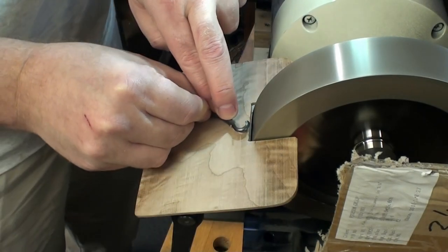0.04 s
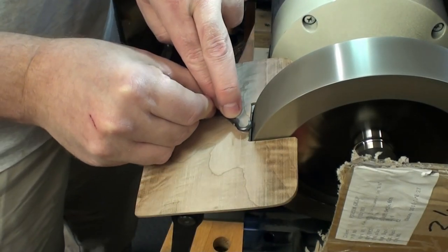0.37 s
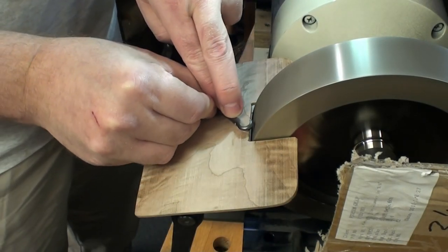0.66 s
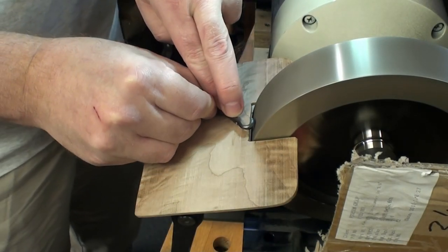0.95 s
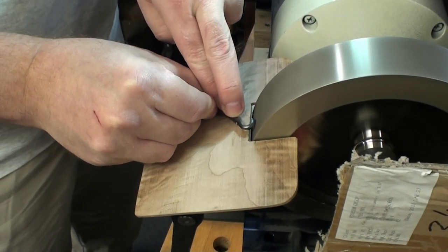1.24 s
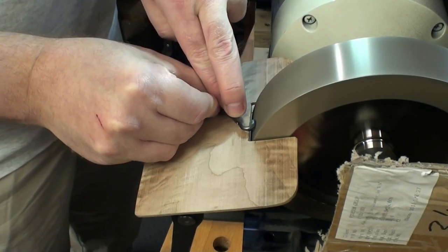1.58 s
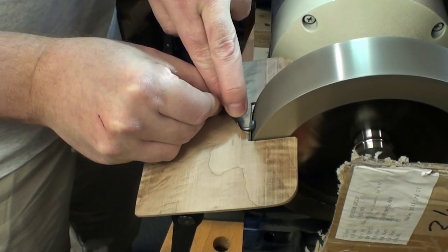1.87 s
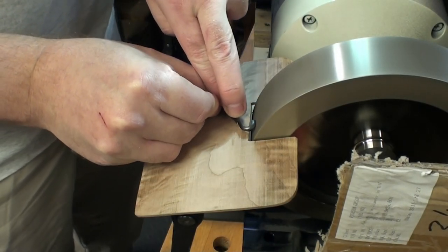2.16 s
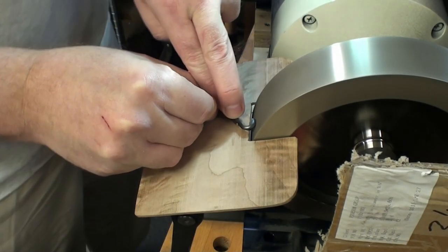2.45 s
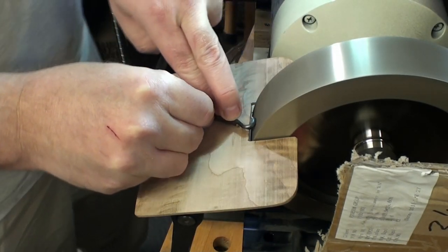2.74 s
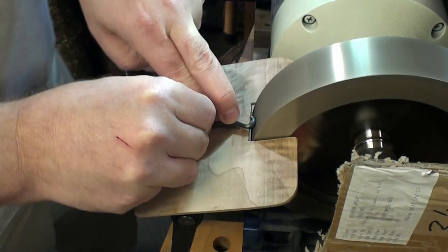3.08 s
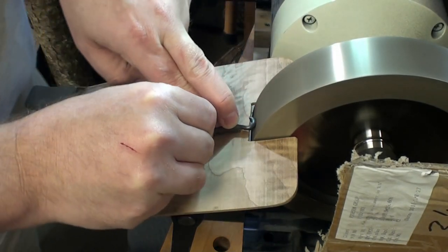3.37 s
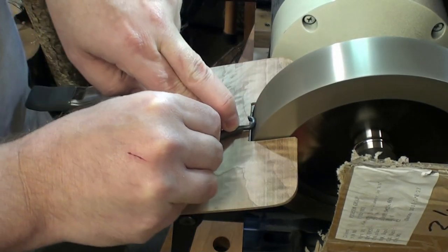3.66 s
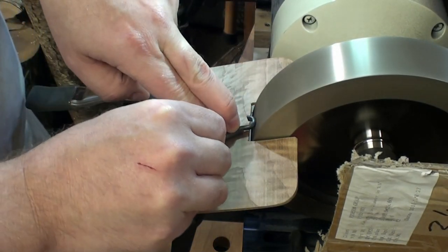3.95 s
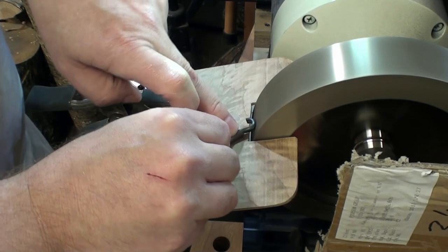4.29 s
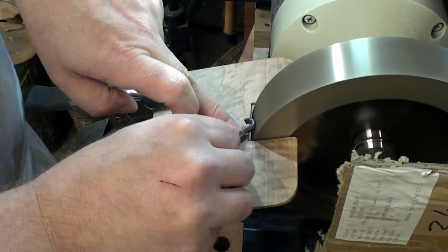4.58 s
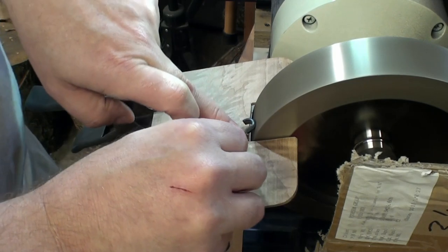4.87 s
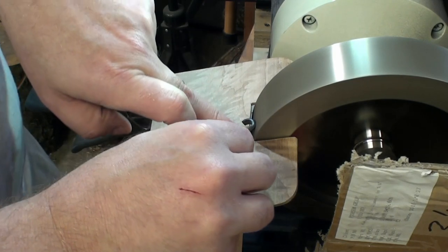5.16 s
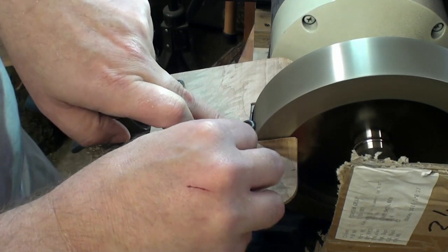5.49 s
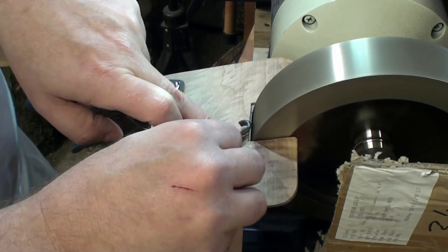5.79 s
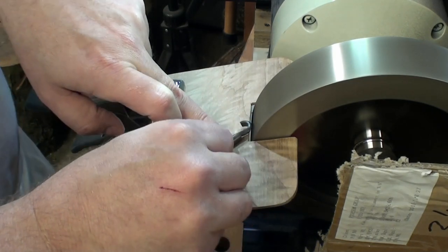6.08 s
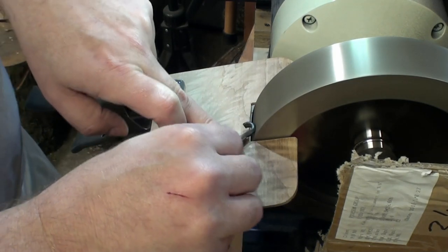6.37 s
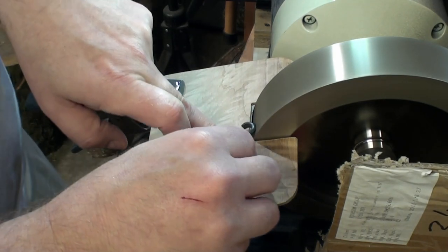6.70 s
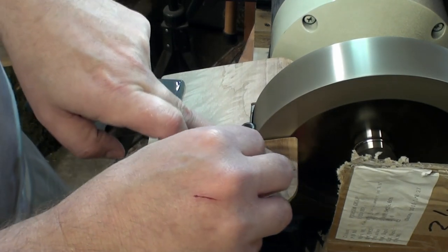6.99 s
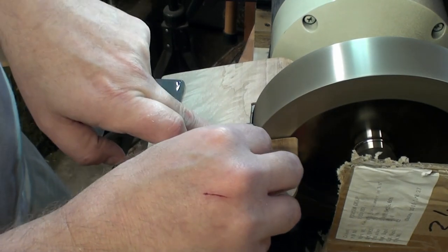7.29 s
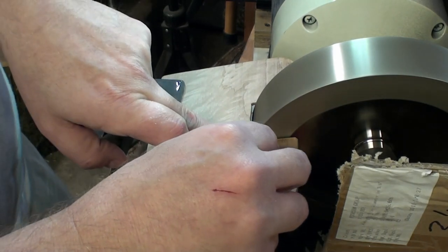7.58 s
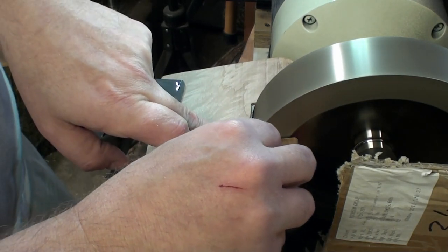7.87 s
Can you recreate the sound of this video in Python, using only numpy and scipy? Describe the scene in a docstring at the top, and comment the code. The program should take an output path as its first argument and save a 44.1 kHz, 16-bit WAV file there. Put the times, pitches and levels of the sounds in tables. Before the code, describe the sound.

A bench grinder hums steadily, then a steel tool meets the wheel twice with a loud, buzzing grinding hiss.

```python
"""Grinding a tool at the workshop bench

A camera's two microphones stand close to a bench grinder humming at thirty turns a second. A steel tool
meets the metal wheel twice. The same grits pass under the edge on every turn, so the hiss buzzes; its
resonances shift as the tool is rolled and sharpen as the push eases. The wheel rings on when the tool
lifts, and the camera's limiter pushes the hum down under the grinding."""
import sys
import numpy as np
from scipy import signal
from scipy.fft import rfft, irfft
from scipy.io import wavfile
from scipy.ndimage import uniform_filter1d, map_coordinates

SR = 44100
rng = np.random.default_rng(int(sys.argv[2]) if len(sys.argv) > 2 else 0)


def log_audio(samples):
    """Write samples as a 16-bit WAV file to the path given in sys.argv[1]."""
    # one column per channel
    frames = np.atleast_2d(samples).T
    # limit to full scale, then quantise
    limited = np.clip(frames, -1, 1)
    pcm = np.round(limited * 32767).astype(np.int16)
    wavfile.write(sys.argv[1], SR, pcm)


N = 358974
TIME = np.arange(N) / SR


# How closely the edge keeps its track. Each row: time in seconds, likeness of successive turns (0-1).
TRACK = [(1.7, 1), (2.6, 0.68), (4.2, 0.82), (5, 0.81), (6, 0.33), (7.8, 0.86)]
# The grip tunes the shank and damps the top of the hiss.
# Each row: time in seconds, shank resonance in Hz, gain above 13 kHz in dB.
GRIP = [(1.6, 4950, 6), (3.5, 5130, 1), (4.2, 4870, -1.5), (5.4, 5240, -3.5), (5.72, 4940, 7),
        (6.35, 5077, 1), (6.9, 5170, -6), (7.4, 4750, -8), (8.1, 4930, -10)]
# Steady peaks and dips of the tool and its rest. Each row: centre in Hz, width in Hz, gain in dB.
STEEL = [(880, 110, -2), (1790, 110, 5), (2090, 60, 3), (2420, 60, 3), (2880, 70, -3), (3550, 110, 2),
         (4200, 110, 3), (4500, 90, -3), (6900, 120, 2), (10900, 120, 2), (11620, 140, -6),
         (12450, 200, -4), (13900, 280, 5), (15100, 200, -3), (15600, 150, 3)]

def scrape(turns, db=-6, shank_width_hz=200, shank_damping=1.46, ring_hz=5050, echo_s=.00164):
    """Close up and dead centre, grits strike the edge and excite the tool's resonances."""
    grits = surface(turns, follow(TRACK)[0])
    hz, t, spectrum = signal.stft(grits, SR, nperseg=512, noverlap=384)
    hz = hz[:, None]
    force_db = force(t)
    place, free_db = hold(t)
    shank_hz, top_db = follow(GRIP, t)
    shank_db = free_db + response(place, 8.7, 2.36, 1.2, (0.51, 0.072, -6.5), (0.832, 0.015, 2.6))
    colour_db = force_db + edge_colour(hz, place) + tool_resonances(hz, place, force_db)
    colour_db += top_db * np.clip((hz - 11800) / 1200, 0, 1)
    colour_db += (shank_db - shank_damping * force_db) * bell(hz, shank_hz, shank_width_hz)
    colour_db += blade_song(hz, t) + peaks(STEEL, hz)
    radiation = hz ** 2 / (hz ** 2 + 260 ** 2)  # a small tool gives off little bass
    bench = 1 + 0.22 * np.exp(-2j * np.pi * hz * echo_s)  # the bench top throws the hiss back
    spectrum = spectrum * gain_of(colour_db) * radiation * bench
    hiss = signal.istft(spectrum, SR, nperseg=512, noverlap=384)[1][:N]
    hiss *= skipping(turns) * contact()
    shank_ring = signal.lfilter(*signal.iirpeak(ring_hz, Q=450, fs=SR), hiss)
    return gain_of(db) * (hiss + 1.12 * shank_ring)


# The hiss of the tip and of the flank on the wheel. Each row: frequency in Hz, gain in dB.
TIP_COLOUR = [(800.0, -13), (1700.0, 0), (2800.0, 2), (4200.0, -6), (4900.0, 0.7), (7000.0, 5.5),
              (8100.0, 3.5), (9200.0, 11.5), (11200.0, 13.5), (11600.0, -14), (12400.0, 7), (13300.0, -1.5),
              (14500.0, -14), (15700.0, -3)]
FLANK_COLOUR = [(700.0, -25.5), (1200.0, -8.5), (2600.0, -0.5), (3200.0, -3), (4100.0, 2), (7000.0, 0.2),
                (8400.0, 2.8), (9400.0, -6), (10400.0, -6), (11100.0, -7), (12600.0, 1.5), (13800.0, -2),
                (15000.0, -1), (15700.0, -22)]

def edge_colour(hz, place):
    """The colour of the hiss in dB as the tool rolls from tip to flank."""
    flank = on_flank(place)
    return (1 - flank) * read(TIP_COLOUR, hz) + flank * read(FLANK_COLOUR, hz)


# The tool's damped modes. Each row: pitches in Hz (start of tip, end of tip, corner), rise in Hz per dB
# of force, width in Hz, damping in dB per dB of force, arguments of response().
TOOL_MODES = [((2300, 1200, 1650), 50, 253, 1.87, (1, 1, -2.5, (0.608, 0.027, 8.5))), ((1930, 2130, 3670),
              16, 160, 0.3, (4.4, 0, 0, (0.461, 0.033, 12.8))), ((6030, 5940, 6570),
              28, 415, 1.45, (14.9, 4.2, -18, (0.582, 0.022, 9.4), (0.838, 0.017, 8.1))),
              ((5700, 9300, 9370), 15, 402, 0.88, (1, 20.7, -35, (0.571, 0.065, -22),
              (0.501, 0.032, 12.1)))]

def tool_resonances(hz, place, force_db, widening=0.16):
    """The tool's peaks in dB: a harder push raises their pitch, widens them and damps them."""
    colour_db = 0
    for pitches_hz, rise, width, damping, answer in TOOL_MODES:
        centre = np.interp(place, [0, TIP_ENDS, 1], pitches_hz) + rise * force_db
        peak_db = response(place, *answer) - damping * force_db
        colour_db += peak_db * bell(hz, centre, width * gain_of(widening * force_db))
    return colour_db


# Spells of singing. Each row: middle and half length in seconds, pitch in Hz, boost in dB.
SINGS = [(3.258, 0.15, 2047, 14.5), (3.953, 0.38, 2033, 21), (5.35, 0.32, 1970, 8)]

def blade_song(hz, t, width_hz=37):
    """The blade sings thinly for a while: a narrow peak, in dB, swells and fades."""
    return sum(db * arch(middle, half, t) * bell(hz, pitch, width_hz)
               for middle, half, pitch, db in SINGS)


# Passes on the wheel. Each row: touch, lift and time taken to lift in seconds, place on the edge
# at touch and at lift (0 tip, 1 far corner), shank boost in dB.
PASSES = [(1.546, 5.77, .07, 0.085, 0.878, -2.5), (6.308, 8.3, .05, 0.93, 0.626, 6)]
TIP_ENDS, FLANK_BEGINS, CORNER_BEGINS = 0.35, 0.53, 0.864

def contact(bite=0.093, settle_s=0.012):
    """About 1 while the edge touches the wheel: it bites hard at once and lifts gradually."""
    touching = np.zeros(N)
    for on, off, lift_s, *_ in PASSES:
        landing = np.clip((TIME - on) / 0.00025, 0, 1) * (1 + bite * np.exp(-abs(TIME - on) / settle_s))
        touching += landing * np.clip((off - TIME) / lift_s, 0, 1)
    return touching


def hold(t):
    """The tool rolls evenly: the place that touches the wheel, and how freely the shank rings (dB)."""
    path = []
    for on, off, _, first, last, shank_db in PASSES:
        path += [(on, first, shank_db), (off, last, shank_db)]
    return follow(path, t)


def on_flank(place):
    """0 while the tip is ground, 1 on the flank."""
    return np.clip((place - TIP_ENDS) / (FLANK_BEGINS - TIP_ENDS), 0, 1)


def response(place, tip_db, flank_db, corner_db, *spots):
    """A mode's answer in dB to a strike here; spots are nodes and antinodes (place, reach, dB)."""
    corner = np.clip((place - CORNER_BEGINS) / (1 - CORNER_BEGINS), 0, 1)
    return tip_db + (flank_db - tip_db) * on_flank(place) + corner_db * corner + peaks(spots, place)


# The hand's push. Each row: time in seconds, force in dB (0 is firm).
PUSH = [(1.55, -2), (2.45, 1.5), (3.2, -2.5), (3.6, -4.5), (4.25, -2), (4.8, -3), (5.38, -3), (5.7, -12.5),
        (6.33, -12.5), (6.55, -7.5), (6.75, -8), (6.95, 0.5), (7.45, -0.5), (8.1, -4)]

def force(t):
    """Force on the wheel in dB: the push, less what is lost while the tool chatters."""
    return follow(PUSH, t)[0] - sum(db * arch(middle, half, t) for middle, half, _, db in CHATTER)


# The hold slackens and the tool skips once a turn. Each row: middle and half length in seconds,
# share of the turn off the wheel, force lost in dB.
CHATTER = [(2.928, 0.2, 0.26, 2), (3.822, 0.048, 0.89, 6), (3.957, 0.097, 0.33, 3.5),
           (6.696, 0.081, 0.48, 2.5)]

def skipping(turns, low_spot_s=2.938, runout=0.12):
    """The wheel runs slightly out of true: the edge loses it at the low spot and lands the harder."""
    from_low_spot = abs((turns - np.interp(low_spot_s, TIME, turns) + .5) % 1 - .5)
    gap = np.clip(sum(off * arch(middle, half, TIME) for middle, half, off, _ in CHATTER), 0, 1)
    touching = np.clip((from_low_spot - gap / 2) / .07 + 1, .19, 1)
    return touching * (1 - runout * np.cos(2 * np.pi * from_low_spot)) / np.sqrt(1 - gap / 2)


def surface(turns, likeness, grits_per_turn=1475):
    """Roughness round the wheel, read once a turn; each turn keeps a share of the one before."""
    count = int(turns[-1]) + 2
    keep = np.clip(np.interp(np.arange(count), turns, likeness), 0, .99)
    grits = rng.standard_normal((count, grits_per_turn))
    for k in range(1, count):
        grits[k] = keep[k] * grits[k - 1] + np.sqrt(1 - keep[k] ** 2) * grits[k]
    return unit_rms(map_coordinates(grits.ravel(), [turns * grits_per_turn], order=5, mode="nearest"))


# The wheel's four families of modes. Each row: seconds to fall 60 dB, blur under the edge in Hz,
# arguments of response().
WHEEL_FAMILIES = [(1.1, 7.8, (-19.5, -15, -14, (0.69, 0.087, 6.9))),
                  (1.17, 8.1, (-23.5, -16, -4, (0.53, 0.24, 2.5))),
                  (0.18, 63, (-23, -22.5, -5.9, (.6, 0.15, 10.4))),
                  (2.56, 11, (-12, -18.5, -10, (0.24, 0.24, 3.5)))]
# Each row: one family's modes, as pairs of pitch in Hz and relative level in dB.
WHEEL_MODES = [
    [(6340, 0)],
    [(6511, -1), (11090, -15), (11300, -16), (2405, -16)],
    [(7803, -1)],
    [(11934, -2), (12077, -2)],
]

def wheel(flutter=0.63, force_share=0.23):
    """The wheel's modes store energy: they flutter under the grits and ring clean once the tool is off."""
    blur = np.clip(flutter * uniform_filter1d(contact(), size=2000), 0, 1)
    drive = contact() * gain_of(force_share * force(TIME))
    place, out = hold(TIME)[0], np.zeros(N)
    for (t60, blur_hz, answer), modes in zip(WHEEL_FAMILIES, WHEEL_MODES):
        keep = gain_of(-60 / (t60 * SR)) ** 2
        power = (drive * gain_of(response(place, *answer))) ** 2
        level = np.sqrt(signal.lfilter([1 - keep], [1, -keep], power))
        for hz, mode_db in modes:
            swing = np.sqrt(1 - blur ** 2) + blur * (drift(blur_hz).real + 1j * drift(blur_hz).real)
            out += level * gain_of(mode_db) * (swing * phasor(hz * TIME)).real
    return np.sqrt(2) * out


# Tones of motor and bench. Each row: multiple of the shaft speed, base level in dB.
SHAFT_ORDERS = [(4, -33.5), (5, -38), (6, -47), (8, -28), (9, -64), (10, -46), (11, -36.5), (12, -34),
                (13, -35.5), (14, -47.5), (15, -39), (17, -35.5), (21, -36.5), (22, -43.5), (23, -43),
                (24, -70), (26, -42.5), (30, -42), (34, -48.5), (35, -34.5), (37, -44), (38, -59)]
# Hands move between motor and microphones. Each row: time in seconds, level shift in dB.
HAND_SHADING = [(0, 1.5), (.75, 7.5), (1.45, 3), (2.3, 5.5), (3.1, 4.5), (4.1, 0.5), (5.7, -2.5), (6.6, 2),
                (7.1, -1.5), (8.1, 1)]
# How each pitch follows that shift. Each row: frequency in Hz, share (negative goes the other way).
SHADING_SHARE = [(120, 0.37), (240, -0.54), (400, 0.6), (630, 1.04), (1050, -0.44)]

def motor(turns, mains_hz=120, mains_null_s=3.88, whine_order=42, slip_hz=1.053, beat_peak_s=0.73):
    """Shaft tones: the lowest beats with the mains hum, and one whine beats with the rotor's slip."""
    shade_db, out = follow(HAND_SHADING)[0], np.zeros(N)
    sway = [1 + 0.1 * drift(rate_hz=14).real for _ in range(3)]
    lag = mains_hz * TIME - SHAFT_ORDERS[0][0] * turns
    throb = 1 - 0.44 * phasor(lag - np.interp(mains_null_s, TIME, lag))
    for k, (order, db) in enumerate(SHAFT_ORDERS):
        tone = phasor(order * turns + rng.random()) * (throb if k == 0 else 1)
        share = read(SHADING_SHARE, order * SHAFT_SPEED[0][1])
        out += gain_of(db + share * shade_db) * sway[k % 3] * tone.real
    beat = unit_rms(1 + .7 * phasor(slip_hz * (TIME - beat_peak_s)))
    out += gain_of(-31.5 + 0.41 * shade_db) * (beat * phasor(whine_order * turns)).real
    return np.sqrt(2) * out


# Air stirred by the wheel, and bearing noise. Each row: frequency in Hz, relative level in dB.
AIR_COLOUR = [(20, -19), (60, -13), (130, 3), (400, 0.5), (800, -8), (1100, -4.5), (1450, -2.5),
              (1900, -17), (5000, -18), (6100, -16), (8700, -14.5), (11000, -25.5), (13000, -30),
              (16000, -32)]
# Resonances of the wheel guard and bearings. Each row: centre in Hz, width in Hz, gain in dB.
GUARD = [(2520, 300, 5.5), (4020, 350, 4), (5940, 160, 8.5), (7000, 92, 5.5), (8560, 230, 4.5),
         (10300, 130, 8.5), (11600, 200, 9)]

def air(turns, db=-27.5, likeness=0.67):
    """Behind the hum, a rush that partly repeats with each turn and sizzles in the guard."""
    hz = np.fft.rfftfreq(N, 1 / SR)
    colour_db = read(AIR_COLOUR, hz) + peaks(GUARD, hz)
    rush = surface(turns, np.full(N, likeness))
    return gain_of(db) * unit_rms(irfft(rfft(rush) * gain_of(colour_db), N))


def workshop(x, t60=0.028, band_hz=(180, 4000)):
    """A short dull tail from the cluttered room, different at each microphone."""
    t = np.arange(SR // 3) / SR
    taps = rng.standard_normal((2, len(t))) * gain_of(-60 * t / t60) * (t > .002)
    taps /= np.linalg.norm(taps, axis=1, keepdims=True)
    wet = signal.fftconvolve(x[None], taps, axes=1)[:, :N]
    return signal.lfilter(*signal.butter(1, band_hz, "bandpass", fs=SR), wet)


def gain_of(db):
    return 10 ** (np.asarray(db) / 20)


def unit_rms(x):
    return x / np.sqrt(np.mean(abs(x) ** 2) + 1e-20)


def phasor(cycles):
    return np.exp(2j * np.pi * cycles)


def follow(rows, t=TIME):
    """The columns of a curve table at times t."""
    seconds, *columns = np.transpose(rows)
    return [np.interp(t, seconds, column) for column in columns]


def read(points, hz):
    """A spectrum table at the frequencies hz."""
    f, value = np.transpose(points)
    return np.interp(np.log(hz + 1), np.log(f + 1), value)


def drift(rate_hz):
    """Slow complex noise of rms 1."""
    f = np.fft.fftfreq(N, 1 / SR)
    spectrum = np.fft.fft(rng.standard_normal(N))
    return unit_rms(np.fft.ifft(spectrum * (f > 0) * np.exp(-(f / rate_hz) ** 2)))


def bell(x, centre, width):
    """The shape of a damped resonance, 1 at its centre."""
    return np.exp(-.5 * ((x - centre) / width) ** 2)


def peaks(rows, x):
    """Bell-shaped peaks and dips, summed in dB."""
    return sum(db * bell(x, centre, width) for centre, width, db in rows)


def arch(middle, half, t):
    """Rises from 0 to 1 and falls back, over `half` seconds on each side of the middle."""
    return np.clip(1 - ((t - middle) / half) ** 2, 0, 1)


# The shaft sags under load. Each row: time in seconds, turns per second.
SHAFT_SPEED = [(0, 29.95), (1.55, 29.95), (1.7, 29.89), (5.6, 29.89), (5.85, 29.95), (6.35, 29.95),
               (6.9, 29.92), (8.14, 29.92)]

def scene(lean_left_db=0.66, room_db=-12.0):
    """Close to the two microphones: tool in the middle, motor a touch left, a little room behind."""
    turns = np.cumsum(follow(SHAFT_SPEED)[0]) / SR
    machine = motor(turns) + air(turns)
    tool = scrape(turns) + wheel()
    pan = gain_of([[lean_left_db], [-lean_left_db]])
    return machine * pan + tool + gain_of(room_db) * workshop(machine + tool)


def record(dry, limit_db=-11.5, recovery_db_per_s=11, top_hz=15850):
    """The camera's limiter looks just ahead and recovers slowly; peaks are rounded, the top is cut."""
    power_db = 10 * np.log10(abs(uniform_filter1d((dry ** 2).mean(0), size=440)) + 1e-12)
    fall_db = TIME * recovery_db_per_s
    held_db = np.maximum.accumulate(power_db + fall_db) - fall_db
    over_db = np.maximum(held_db - limit_db, 0)
    ducked = dry / gain_of(uniform_filter1d(over_db, size=220))
    rounded = ducked / (1 + (ducked / .82) ** 6) ** (1 / 6)
    lowpass = signal.firwin(511, top_hz, window=("kaiser", 9), fs=SR)
    return signal.oaconvolve(rounded, lowpass[None], "same")


dry = scene()
out = record(dry)
log_audio(out)
```